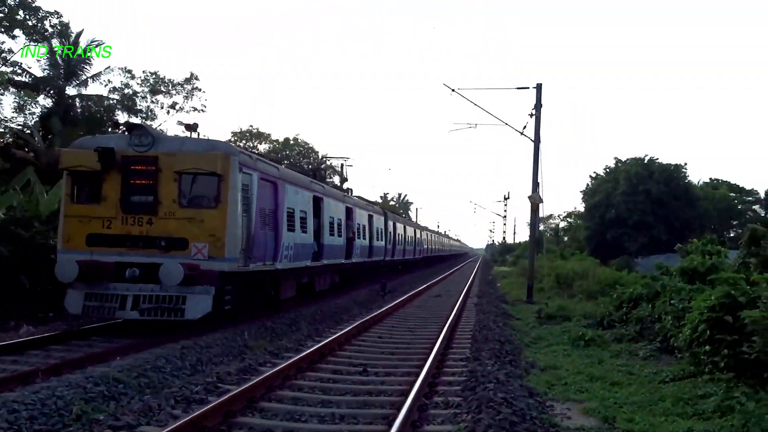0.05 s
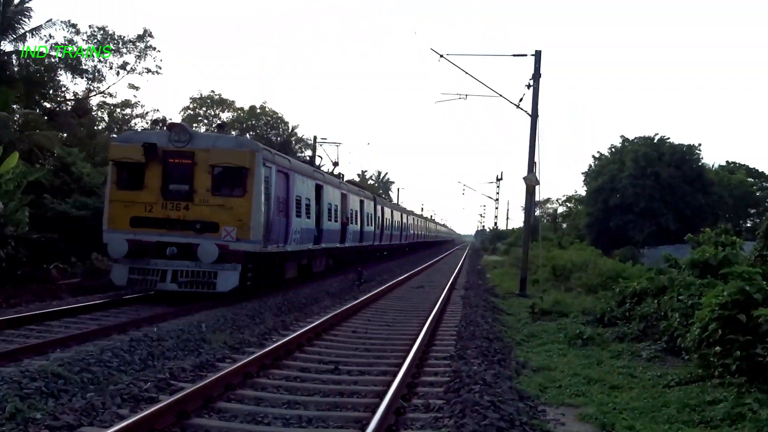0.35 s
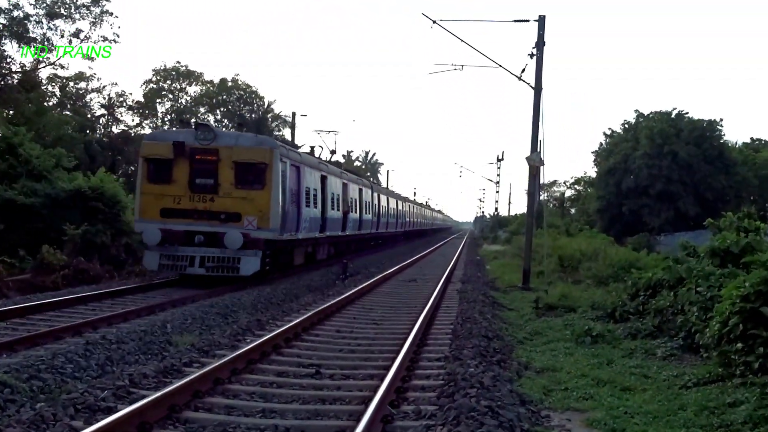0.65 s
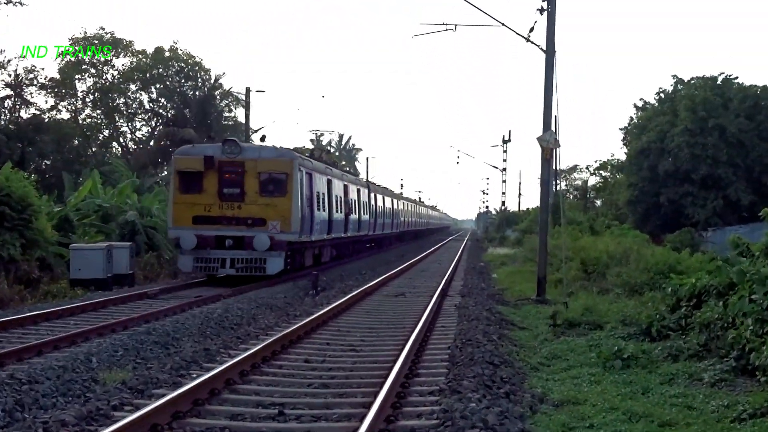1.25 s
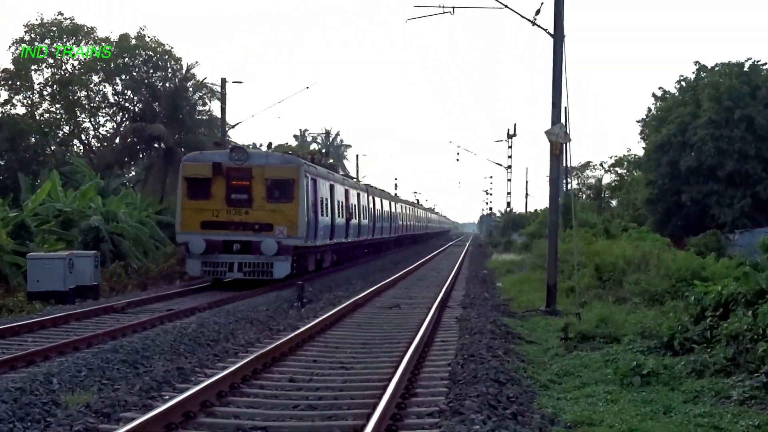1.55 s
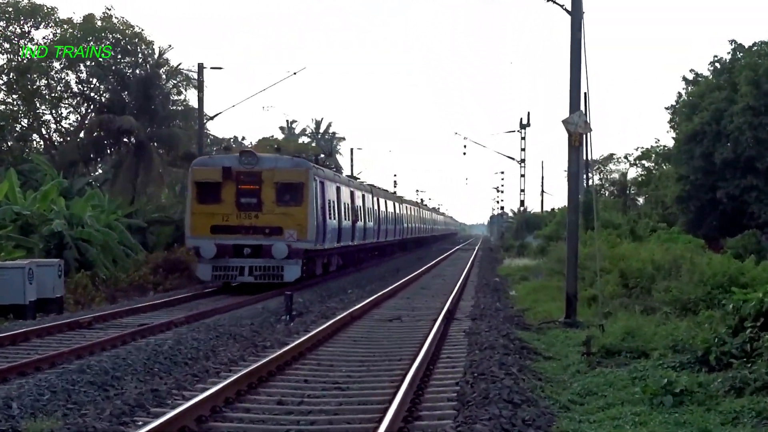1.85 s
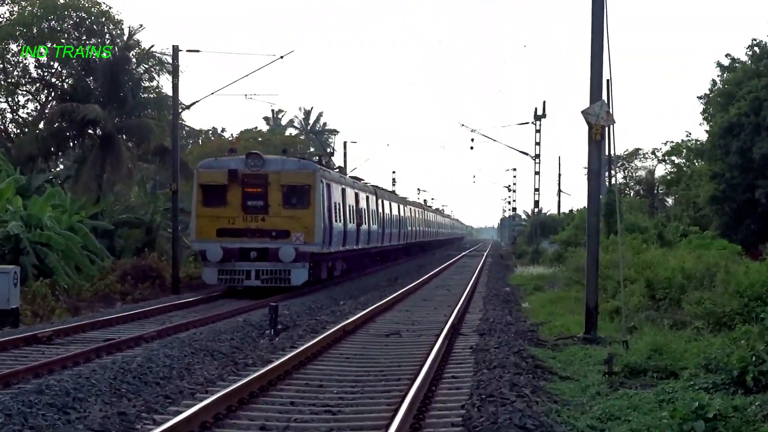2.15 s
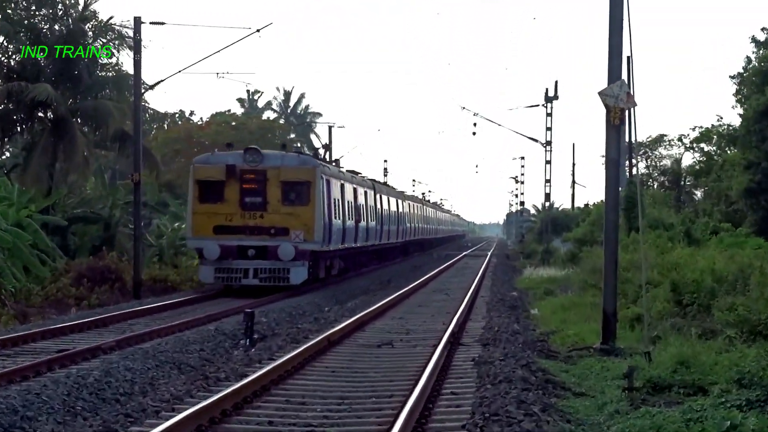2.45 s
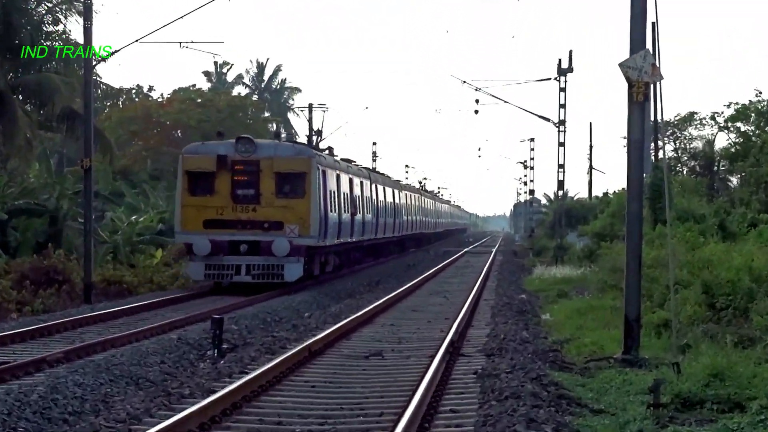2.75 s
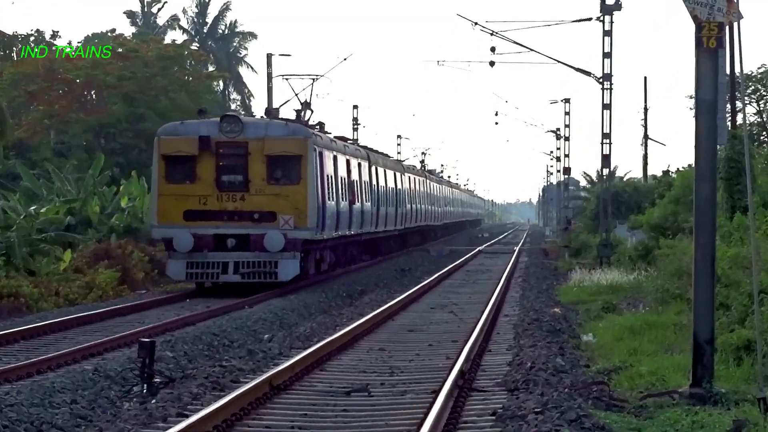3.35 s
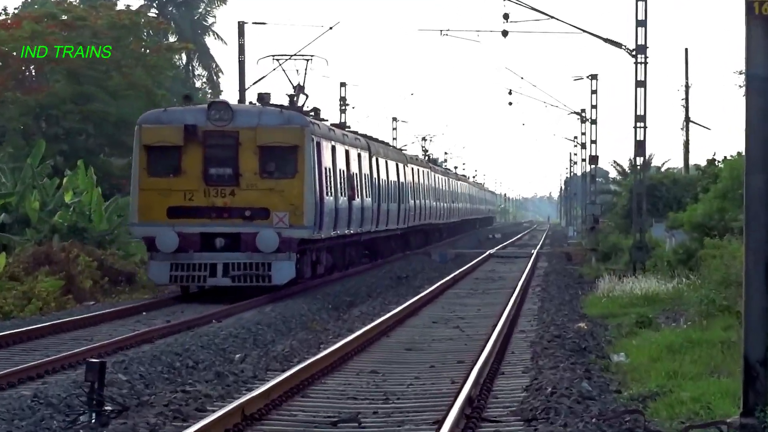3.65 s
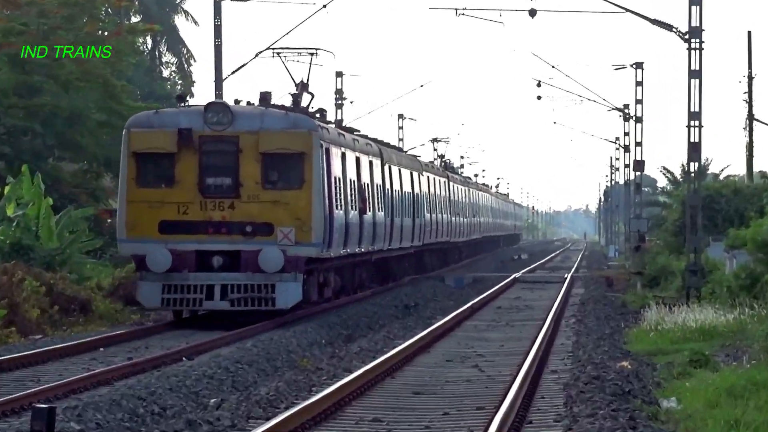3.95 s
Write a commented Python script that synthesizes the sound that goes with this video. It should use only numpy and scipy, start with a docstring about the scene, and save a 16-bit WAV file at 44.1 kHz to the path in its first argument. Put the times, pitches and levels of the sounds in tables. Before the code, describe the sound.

An electric train runs by outdoors, a little to the left, with whining gears and wheels roaring and clattering over joints. The rails hiss in bright swells, wheels squeak briefly, and wind nudges the microphone as the train recedes.

```python
"""An outdoor railway line: an electric train runs by, a little to the left, and draws away.
The gears of the nearest motor coach whine and fade into the blurred hum of the coaches behind.
The wheels roar and clatter over joints; their strikes set the rails hissing in bright swells.
Flanges squeak against the rail, and wind nudges the microphone."""
import sys
import numpy as np
from scipy import signal
from scipy.io import wavfile
from scipy.ndimage import uniform_filter1d

SR = 44100
rng = np.random.default_rng(int(sys.argv[2]) if len(sys.argv) > 2 else 0)


def unload_audio(sound):
    """Save the sound as a 16-bit wav file, at the path given as the first command line argument."""
    columns = np.transpose(np.atleast_2d(sound))
    # keep every value between -1 and 1, then stretch to whole-number steps
    steps = np.round(np.clip(columns, -1, 1) * 32767)
    wavfile.write(sys.argv[1], SR, steps.astype(np.int16))


N = 176400
T = np.arange(N) / SR
BAND_EDGES_HZ = 20 * 2 ** (np.arange(30) / 3)

# Nearest gears. Each row: time in seconds, tooth rate in Hz.
MESH_HZ = [(0, 389), (.45, 389), (.7, 392), (1.2, 391.5), (1.7, 392.5), (4, 398.5)]
# Their first two harmonics. Each row: time in seconds, level in dB.
FUNDAMENTAL_DB = [(0, -22), (.1, -25.5), (.16, -26.5), (.24, -26.5), (.3, -20.5), (.41, -19.5),
                  (.47, -35.5), (.6, -17.5), (.7, -25.5), (.76, -22.5), (.86, -21), (.92, -28),
                  (1.0, -29.5), (1.04, -19), (1.17, -25), (1.27, -44), (1.38, -25), (1.48, -41), (2.2, -55),
                  (4, -90)]
OCTAVE_DB = [(0, -40), (.08, -14.5), (.2, -25.5), (.42, -25.5), (.6, -29), (.75, -54.5), (.88, -25),
             (1.0, -27), (1.35, -31), (1.48, -33), (1.6, -22.5), (1.75, -31), (2.02, -24.5), (2.16, -57),
             (4, -70)]
# Their overtones. Each row: multiple of the tooth rate, initial level in dB.
OVERTONES = [(3, -31.5), (4, -45), (5, -32.5), (6, -43), (8, -38.5), (10, -46.5)]
# Far gears. Each row: initial pitch in Hz, width in Hz, initial level in dB, fade in dB/s,
# left-right correlation, direct share of power.
FAR_GEARS = [(398.5, 18.4, -30.5, 1.5, 0.91, 0.39), (445.4, 10.7, -36, 3, 0.85, 0.028),
             (740.8, 16, -21, 6.5, 0.25, 0.14), (793.5, 31.6, -30.5, 2, 0.098, 0),
             (998, 24, -36, 22, .2, 0), (1188.5, 41, -38.5, 1.5, 0.12, 0), (1958, 77, -40.5, 1.5, 0.16, 0),
             (2314, 88, -39.5, 6, 0.18, 0.13), (3160, 26, -41.5, 13, 0.23, 0.27)]
# Their common swell. Each row: time in seconds, gain in dB.
FAR_SWELL_DB = [(0, -3), (.9, -2), (1.2, 2), (1.47, -3), (1.58, 4), (1.75, -3.5), (2.0, 0), (2.22, -2),
                (2.38, 1.5), (2.6, 2), (2.78, 0.5), (3.0, -0.5), (3.55, -3.5), (3.66, 0.5), (4, 2.5)]

# Rolling noise envelopes. Each row: time in seconds, level in dB.
ROAR_DB = [(0, -26.5), (.3, -28.5), (.42, -31.5), (.65, -28.5), (.85, -28), (1.1, -33.5), (1.3, -30.5),
           (1.6, -32.5), (1.95, -34), (2.2, -36), (2.4, -36), (2.75, -34.5), (2.9, -40), (3.5, -36.5),
           (4, -40.5)]
GRIND_DB = [(0, -35.5), (.3, -38), (.6, -51), (.95, -39.5), (1.15, -43), (1.35, -41), (1.6, -37),
            (1.9, -44), (2.35, -49.5), (2.7, -42), (3.1, -44.5), (4, -48.5)]
HISS_DB = [(0, -39), (.8, -47.5), (1.5, -49.5), (2.3, -53.5), (2.48, -53.5), (2.58, -46), (2.72, -50.5),
           (3.5, -50), (4, -64)]
RUMBLE_DB = [(0, -49), (.7, -42), (1.3, -39.5), (1.6, -45.5), (2.4, -46.5), (3.2, -48), (4, -48.5)]
# Noise spectra. Each row: frequency in Hz, relative density in dB.
ROAR_SPECTRUM = [(200, -12.5), (310, -10.5), (430, -2.5), (540, -20.5), (680, 5.5), (870, -1), (1050, 2.5),
                 (1300, -5), (1600, -9), (2100, -15), (3000, -18), (4500, -28.5)]
GRIND_SPECTRUM = [(1700, -2.5), (2300, 8), (3100, 7.5), (3800, -6), (5000, -22)]
HISS_SPECTRUM = [(3800, -1.5), (4300, 2.5), (5000, -1), (6000, -5), (7500, -1.5), (11000, -21),
                 (15500, -23)]
RUMBLE_SPECTRUM = [(20, -8), (35, -1.5), (55, -1), (100, 4), (150, -4.5), (220, -11.5), (330, 2.5),
                   (600, -21)]
KNOCK_SPECTRUM = [(200, -10.5), (420, 17.5), (550, -16), (850, 10.5), (1150, 11), (1700, -10), (3000, -5.5)]
CLANK_SPECTRUM = [(1500, 17), (2200, 9), (3200, 7), (5400, -4), (7000, 2), (12000, -24)]
RAIL_HISS_SPECTRUM = [(4500, -2), (5600, -6), (6700, 2.5), (8000, 7), (9500, 0.5), (11500, -1.5),
                      (14000, -6), (15500, -10)]
RAIL_BODY_SPECTRUM = [(2000, -3), (2800, -2), (4100, -4.5), (4900, -7), (5600, -2), (7000, -9)]
WIND_SPECTRUM = [(25, -5), (70, -4), (140, 3.5), (230, 1), (400, -10.5), (900, -16)]
# Stereo image of the noises. Each row: frequency in Hz, left-right correlation.
TRAIN_CORR = [(30, 0.73), (100, 0.83), (200, 0.66), (400, 0.87), (550, 1), (750, 0.19), (1000, 0.054),
              (3000, 0.2), (7000, 0.3), (14000, 0.13)]
WIND_CORR = [(50, 0.97), (170, 0.21)]

# Car body boom: pitch in Hz, width in Hz, initial level in dB, fade in dB/s.
BODY_BOOM = (305, 67, -36.5, 12.5)
# Car body thud: pitch in Hz, width in Hz.
BODY_THUD = (320, 62)
# Wheels over joints. Each row: start in seconds, knock in dB, clank and thud in dB relative to it.
JOINT_HITS = [(0.067, -26, -1.5, -10), (0.233, -29.5, -16, -7), (0.27, -28, 2, 1.5), (0.493, -37.5, 9, -23),
              (0.751, -28.5, -25, -6), (0.847, -25, -9, -17), (0.871, -26, -7, -14), (1.015, -27, -6.5, -8),
              (1.067, -26, -19, -10), (1.539, -33, -16, -10), (1.596, -33.5, -16, -14),
              (2.349, -34.5, -13.5, -16), (2.681, -33.5, -6, -17), (3.636, -30.5, -11, -20)]
# Resonances. Each row: pitch in Hz, width in Hz, relative level in dB.
KNOCK_MODES = [(405.6, 23, -0.5), (803, 190, 2)]
RAIL_MODES = [(3940, 180, -14), (4350, 65, -14), (5380, 110, -16.5), (6060, 57, -13.5), (7170, 60, -18),
              (7790, 77, -11.5), (8240, 280, -9), (9400, 31, -13), (11000, 130, -17), (14650, 90, -19)]
# Wheel strikes in the rails. Each row: start in seconds, crack in dB, swell in dB, time to peak in
# seconds, swell fade in dB/s, lower ringing in relative dB, zing in dB, pan in dB.
RAIL_STRIKES = [(0.059, -41.5, -53.5, 0.094, 31, 3, -55, 1),
                (0.262, -31.5, -33.5, 0.095, 37.5, -7.5, -38, 1.3),
                (0.839, -36, -41, 0.07, 11, -3.5, -49, 0.8), (1.008, -35.5, -33, 0.12, 80, 2, -39, 2),
                (1.53, -43.5, -57, 0.068, 64, 4, -58, 1), (2.754, -44.5, -36.5, 0.22, 33.5, -7.5, -39, 1),
                (3.63, -48, -40.5, 0.16, 86, -20, -41, 1)]
# Flange squeaks. Each row: peak time, rise and ring-out in seconds, pitch and width in Hz, level in dB.
SQUEAKS = [(0.57, 0.13, 0.089, 7830, 120, -37.5), (0.57, 0.055, 0.083, 7620, 90, -33),
           (0.885, 0.039, 0.06, 6530, 17, -33.5), (2.075, 0.036, 0.055, 6580, 70, -49),
           (2.205, .012, 0.056, 4570, 88, -44), (3.275, 0.02, 0.019, 6555, 15, -26)]
# Wind buffets. Each row: centre in seconds, half length in seconds, level in dB.
BUFFETS = [(0.274, 0.011, -30.5), (0.649, 0.037, -33.5), (1.02, 0.052, -39.5), (1.273, 0.037, -35),
           (2.749, 0.022, -26.5), (2.808, 0.027, -28)]


def near_gears():
    """Tooth whine of the nearest motor coach, fading as it leaves."""
    hz = in_time(MESH_HZ) * (1 + .003115 * drift(5.51))
    scatter_hz, fade_db_per_s = 21.6, 16.5
    fundamental = tone(hz, scatter_hz, corr=1, direct=.95, lead_rad=.39) * pan(.5)
    octave = tone(2 * hz, scatter_hz, corr=.14, direct=.61, lead_rad=.22) * pan(.34)
    whine = from_db(in_time(FUNDAMENTAL_DB)) * fundamental + from_db(in_time(OCTAVE_DB)) * octave
    for multiple, db in OVERTONES:
        gain = from_db(db - fade_db_per_s * T) * flicker() * pan(.69)
        whine += gain * tone(multiple * hz, scatter_hz, corr=.1, direct=.61, lead_rad=.33)
    return whine


def far_gears():
    """The other motor coaches: narrow bands, blurred by distance, creeping up in pitch."""
    hum, rise = 0, 1 + .009 * T
    for hz, width_hz, db, fade_db_per_s, corr, direct in FAR_GEARS:
        hum += from_db(db - fade_db_per_s * T) * tone(hz * rise, width_hz, corr, direct)
    return hum * from_db(in_time(FAR_SWELL_DB)) * pan(.4)


def wheels():
    """Steel rolling on steel: roar, grind and hiss, with ground rumble and car body boom."""
    roar = from_db(in_time(ROAR_DB) - .5) * noise(ROAR_SPECTRUM, flicker_db=1.8) * pan(2.5)
    grind = steel(noise(GRIND_SPECTRUM, flicker_db=2.5), ring_db=-3.5, span_hz=(1937, 4160), modes=9)
    grind *= from_db(in_time(GRIND_DB)) * pan(.29)
    hiss = from_db(in_time(HISS_DB)) * noise(HISS_SPECTRUM, flicker_db=4.6) * pan(.46)
    rumble = from_db(in_time(RUMBLE_DB)) * noise(RUMBLE_SPECTRUM, flicker_db=4.5)
    rolling = (roar + grind) * bogie_rattle()
    hz, width_hz, db, fade_db_per_s = BODY_BOOM
    boom = from_db(db - fade_db_per_s * T) * tone(hz, width_hz, corr=1)
    return rolling + hiss + rumble + boom


def bogie_rattle(knocks_per_s=37, ring_s=.011):
    """Small random bogie knocks, as a gain of rms 1."""
    knocks = (rng.random(N) < knocks_per_s / SR) * np.minimum(rng.exponential(1, N), 3)
    decays = signal.lfilter([1], [1, -np.exp(-1 / (ring_s * SR))], knocks)
    return rms_one(1 + .24 * uniform_filter1d(decays, size=90))


def clatter(attack_s=.0015):
    """Each joint gives a dull knock that rings on in the car body, a metallic clank and a thud."""
    knock_power = clank_gain = thud_gain = 0
    for start_s, db, clank_db, thud_db in JOINT_HITS:
        hit = from_db(db) * blow(start_s, attack_s, fade_db_per_s=231)
        tail = from_db(db - 16.5) * blow(start_s, attack_s, fade_db_per_s=75)
        knock_power += hit ** 2 + tail ** 2
        clank_gain += from_db(clank_db) * hit
        thud_gain += from_db(thud_db) * hit
    clank = steel(noise(CLANK_SPECTRUM, flicker_db=.5), ring_db=1, span_hz=(1813, 6150), modes=14)
    knock = noise(KNOCK_SPECTRUM, flicker_db=2)
    knock += sum(from_db(db) * tone(hz, width_hz, corr=1) for hz, width_hz, db in KNOCK_MODES)
    thud = tone(*BODY_THUD, corr=1, direct=.41)
    return (np.sqrt(knock_power) * knock + clank_gain * clank + thud_gain * thud) * pan(.98)


def rails(attack_s=.0082, rounding_s=.1, zing_rise_hz_per_s=7000):
    """Each strike cracks, then swells into a ringing hiss; the rail disperses it into a rising zing."""
    hiss_power = body_power = zing_gain = zing_age_s = 0
    for start_s, crack_db, swell_db, peak_s, fade_db_per_s, body_db, zing_db, pan_db in RAIL_STRIKES:
        past_peak_s = T - start_s - peak_s
        rise_db = 6 * past_peak_s / peak_s
        fall_db = -fade_db_per_s * (np.hypot(past_peak_s, rounding_s) - rounding_s)
        shape_db = np.where(past_peak_s < 0, rise_db, fall_db)
        swell = from_db(swell_db + shape_db) * blow(start_s, attack_s, fade_db_per_s=0)
        crack = from_db(crack_db) * blow(start_s, attack_s, fade_db_per_s=87)
        power = (swell ** 2 + crack ** 2) * pan(pan_db) ** 2
        hiss_power += power
        body_power += power * from_db(body_db) ** 2
        zing_gain += from_db(zing_db) * blow(start_s, attack_s, fade_db_per_s=54)
        zing_age_s = np.where(T > start_s, T - start_s, zing_age_s)
    hiss = noise(RAIL_HISS_SPECTRUM, flicker_db=1.2)
    hiss = steel(hiss, ring_db=-4.5, span_hz=(5850, 15530), modes=80)
    for hz, width_hz, db in RAIL_MODES:
        hiss += from_db(db) * flicker() * tone(hz * (1 + .006 * drift(5)), width_hz, corr=.12)
    body = noise(RAIL_BODY_SPECTRUM, flicker_db=1.2)
    body = steel(body, ring_db=-3.5, span_hz=(2359, 6320), modes=18)
    zing = zing_gain * tone(7120 + zing_rise_hz_per_s * zing_age_s, width_hz=410, corr=.42)
    grit = from_db(.64 * drift(190))
    return (np.sqrt(hiss_power) * hiss + np.sqrt(body_power) * body + zing) * grit


def flanges():
    """Flange against rail: rough squeaks build up, then ring out."""
    squeaks = 0
    for peak_s, rise_s, ring_s, hz, width_hz, db in SQUEAKS:
        shape = np.where(T < peak_s, bump(peak_s, rise_s), np.exp(-np.abs(T - peak_s) / ring_s))
        squeaks += from_db(db) * shape * tone(hz, width_hz, corr=0, direct=.6, lead_rad=1.3)
    roughness = from_db(drift(180))
    return squeaks * roughness * pan(2.4)


def wind():
    """Low buffets on the microphone, alike left and right only in the deep bass."""
    gusts = sum(from_db(db) * bump(centre_s, half_s) for centre_s, half_s, db in BUFFETS)
    return gusts * noise(WIND_SPECTRUM, flicker_db=1, corr_curve=WIND_CORR) * pan(-.77)


def steel(x, ring_db, span_hz, modes, width_hz=20):
    """Add narrow resonances of uneven pitch and strength; rms 1."""
    low_hz, high_hz = span_hz
    r, rings = np.exp(-np.pi * width_hz / SR), 0
    for k, (place, strength) in enumerate(rng.random((modes, 2))):
        hz = low_hz + (high_hz - low_hz) * (k + place) / modes
        feedback = [1, -2 * r * np.cos(2 * np.pi * hz / SR), r * r]
        rings += (.5 + strength) * signal.lfilter([1, 0, -1], feedback, x)
    return rms_one(x + from_db(ring_db) * rms_one(rings))


def tone(hz, width_hz, corr, direct=0, lead_rad=0):
    """Stereo tone, part direct with the left leading, part scattered over many paths; rms 1."""
    mid, side = [rms_one(drift(width_hz) + 1j * drift(width_hz)) for _ in range(2)]
    phase = 2 * np.pi * (np.cumsum(hz * np.ones(N)) / SR + rng.random())
    straight = np.sqrt(direct) * np.exp(.5j * lead_rad * np.array([[1], [-1]]))
    scattered = np.sqrt(1 - direct) * stereo(mid, side, corr)
    return rms_one(np.real((straight + scattered) * np.exp(1j * phase)))


def noise(spectrum, flicker_db, corr_curve=TRAIN_CORR):
    """Stereo noise in third octaves, each flickering on its own; rms 1."""
    bands, white = 0, rng.standard_normal((2, 2, N))
    first_hz, last_hz = spectrum[0][0], spectrum[-1][0]
    for k, (low_hz, high_hz) in enumerate(zip(BAND_EDGES_HZ, BAND_EDGES_HZ[1:])):
        hz = np.sqrt(low_hz * high_hz)
        if first_hz / 2 < hz < last_hz * 2:
            bandpass = signal.butter(2, [low_hz, high_hz], "band", fs=SR, output="sos")
            mid, side = signal.sosfilt(bandpass, white[k % 2])
            skirt = min(1, hz / first_hz, last_hz / hz) ** 2
            db = at_hz(spectrum, hz) + flicker_db * np.clip(drift(10.6), -2, 2)
            bands += skirt * from_db(db) * stereo(mid, side, at_hz(corr_curve, hz))
    return rms_one(bands)


def flicker(depth_db=3, rate_hz=5):
    """Gain that wavers as the paths to the microphone change; rms 1."""
    return rms_one(from_db(depth_db * np.clip(drift(rate_hz), -2, 2)))


def drift(rate_hz):
    """Smooth random signal, rms about 1."""
    step, settle = 20, 2000
    r = np.exp(-2 * np.pi * rate_hz * step / SR)
    white = rng.standard_normal(N // step + settle + 2)
    slow = signal.lfilter([1], [1, -2 * r, r * r], white)[settle:]
    return np.interp(np.arange(N) / step, np.arange(len(slow)), rms_one(slow))


def blow(start_s, attack_s, fade_db_per_s):
    """Linear attack, exponential fade."""
    age_s = np.maximum(T - start_s, 0)
    return np.minimum(age_s / attack_s, 1) * from_db(-fade_db_per_s * age_s)


def bump(centre_s, half_s):
    """Gaussian swell."""
    return np.exp(-.5 * ((T - centre_s) / half_s) ** 2)


def stereo(mid, side, corr):
    """Two channels of given correlation from two unrelated signals."""
    corr = np.clip(corr, -.99, .99)
    return np.sqrt((1 + corr) / 2) * mid + np.sqrt((1 - corr) / 2) * side * np.array([[1], [-1]])


def pan(db):
    """Left up and right down by db."""
    return from_db(db * np.array([[1], [-1]]))


def in_time(rows):
    """Interpolate (s, value) rows over T."""
    return np.interp(T, *np.transpose(rows))


def at_hz(rows, hz):
    """Interpolate (Hz, value) rows on a log axis."""
    row_hz, values = np.transpose(rows)
    return np.interp(np.log(hz), np.log(row_hz), values)


def from_db(db):
    """Decibels to gain."""
    return 10 ** (np.asarray(db) / 20)


def rms_one(x):
    """Scale to unit rms."""
    return x / np.sqrt(np.mean(np.abs(x) ** 2) + 1e-20)


def scene():
    """Train and wind, in stereo."""
    return near_gears() + far_gears() + wheels() + clatter() + rails() + flanges() + wind()


def record(dry):
    """Steep low-pass."""
    cutoff_hz = 15750
    return signal.sosfilt(signal.ellip(12, .1, 90, cutoff_hz, fs=SR, output="sos"), dry)


dry = scene()
out = record(dry)
unload_audio(out)
```